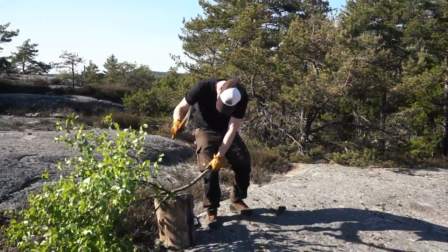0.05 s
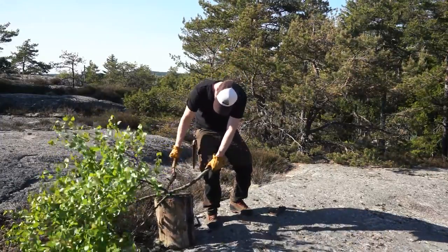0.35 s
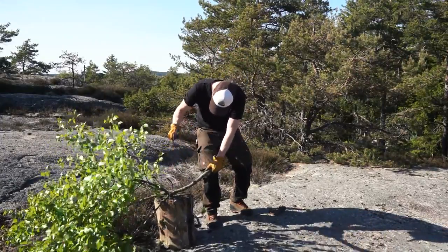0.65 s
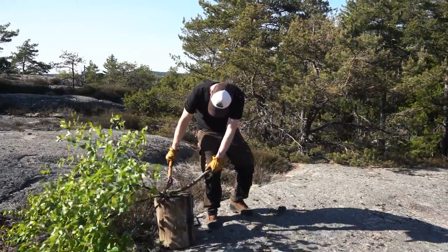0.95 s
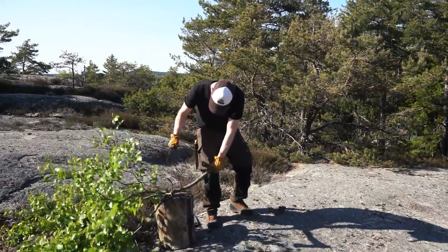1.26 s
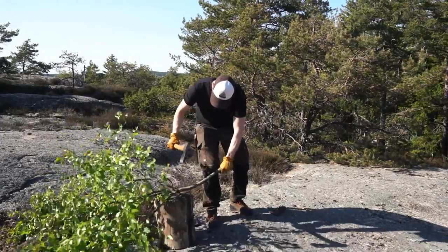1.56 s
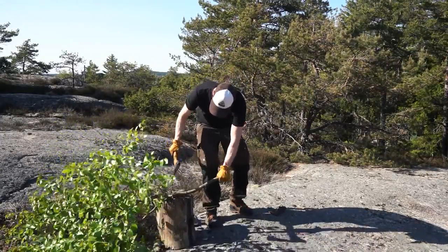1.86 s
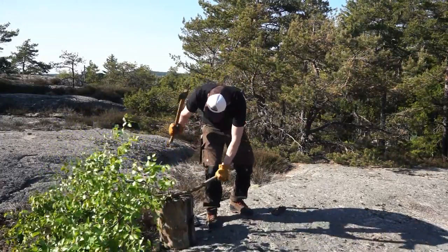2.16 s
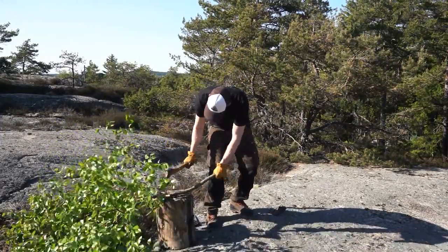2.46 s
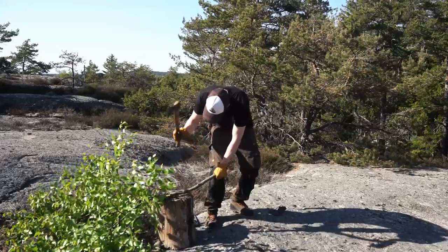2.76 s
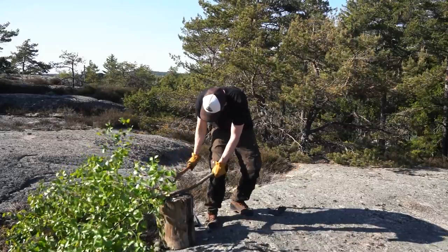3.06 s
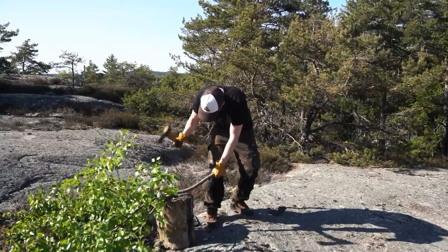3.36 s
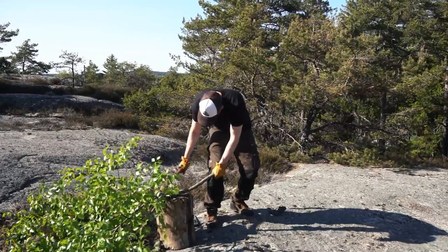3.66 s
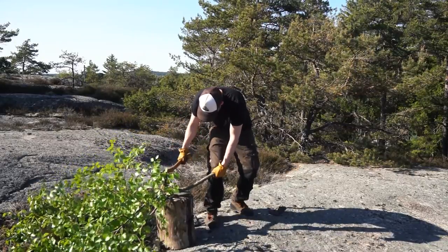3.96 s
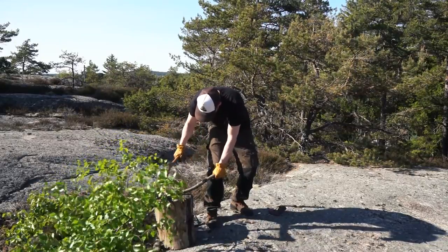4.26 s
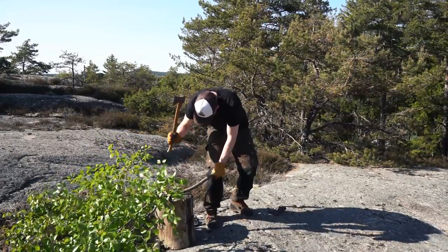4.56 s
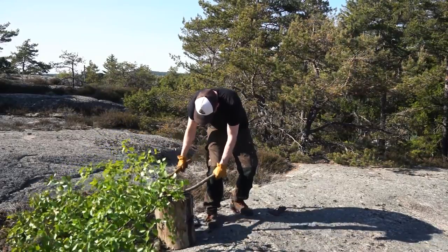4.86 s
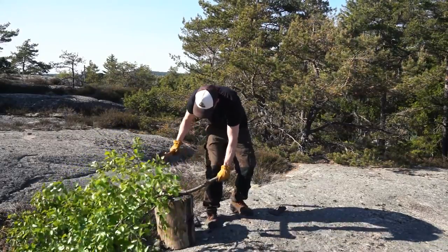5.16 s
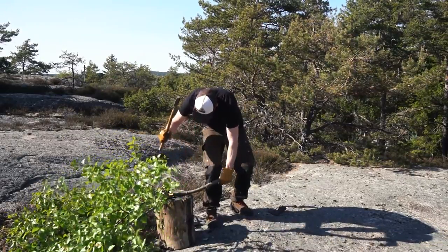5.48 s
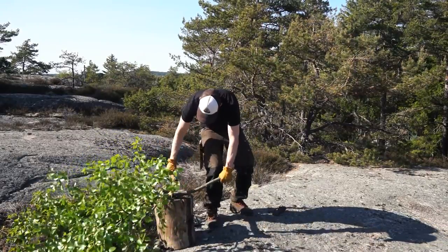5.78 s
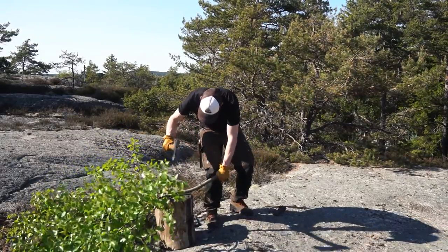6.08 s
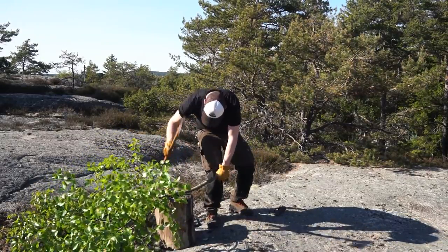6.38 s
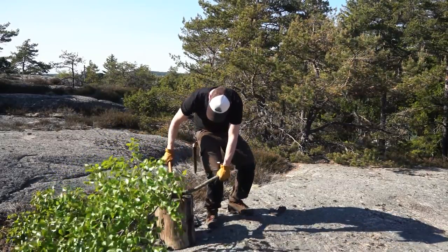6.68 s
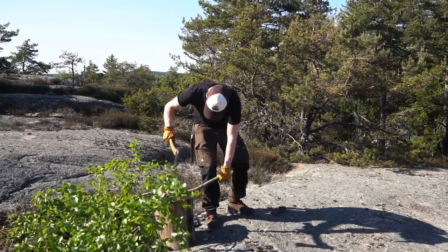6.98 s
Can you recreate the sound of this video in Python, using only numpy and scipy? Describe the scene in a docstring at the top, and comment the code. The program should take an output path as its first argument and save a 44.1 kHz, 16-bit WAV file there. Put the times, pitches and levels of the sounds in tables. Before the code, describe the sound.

Eight sharp hatchet chops bite into a leafy branch on a wooden block, with rustling leaves, snapping twigs and light wind.

```python
"""Bare rock at the edge of a pine wood; a stereo pair close to a chopping block, the work just to the left.
Light wind runs throughout. Leaves stir and a faint whistle rises, then eight hatchet blows fall on a leafy
branch: each bites, splits the wood, tears fibres and sets the leaves shivering. Between blows twigs snap,
leaves and small twigs tick and bark is dragged over the block; just before the last blow the cut creaks.
Rock and bushes give a short tail, the edge of the wood a faint later one."""
import sys
import numpy as np
from scipy import signal
from scipy.fft import rfft, irfft, next_fast_len
from scipy.io import wavfile
from scipy.ndimage import uniform_filter1d, map_coordinates

SR = 44100
rng = np.random.default_rng(int(sys.argv[2]) if len(sys.argv) > 2 else 0)


def dump_mix(stems):
    """Bounce the given channels to the path in sys.argv[1] as a 16-bit WAV at rate SR."""
    frames = np.atleast_2d(stems).T  # one column per channel
    limited = np.clip(frames, -1, 1)  # hard clip at full scale
    pcm = np.round(limited * 32767).astype(np.int16)
    wavfile.write(sys.argv[1], SR, pcm)


N = 314405

# hatchet blows: start_s, split_lag_s, bite_db (against the split), bite_hz, tear_s, low_ring_hz,
# high_ring_hz, strength_db, thud_db, bright_db_per_octave, jolt_db
BLOWS = [(0.3653, 0.0031, -16, 3000, 0.0038, 1080, 2090, -1.9, 8.5, 1.6, -28),
         (0.9919, 0.004, -8.5, 2500, 0.0094, 1550, 2430, -4, -1.5, 3.5, -37.5),
         (2.4355, 0.0024, -6.5, 1200, 0.0053, 940, 1980, 3, 5.5, -1.8, -32),
         (3.0638, 0.0023, -14, 3000, 0.0014, 1020, 1250, 5, -6.5, -4, -42),
         (3.7425, 0.0047, -1, 6200, 0.00049, 1980, 3120, 0, -5, -0.45, -43),
         (4.7782, 0.0015, -14, 2510, 0.0043, 1460, 2400, 0, -3, -1.1, -48),
         (5.7134, 0.004, -8, 5100, 0.0051, 1980, 2980, -1, 2.5, 1.2, -39),
         (6.534, 0.0031, -10, 2500, 0.005, 860, 1340, -1.6, 3.5, 1.5, -42.5)]
# left-right likeness of sound arriving from all around: frequency_hz, likeness
DIFFUSE_LIKENESS = [(150, 0.97), (400, 0.75), (800, 0.31), (1500, 0), (10000, 0.023)]


def amp(db):
    """Decibels to gain."""
    return 10 ** (np.asarray(db) / 20)


def unit(x):
    """Scale to rms 1."""
    return x / np.sqrt(np.mean(x ** 2) + 1e-20)


def along(points, hz):
    """Read (frequency_hz, value) points on a log frequency axis."""
    f, values = np.transpose(points)
    return np.interp(np.log(hz + 1), np.log(f + 1), values)


def wobble(rate):
    """A smooth random curve, rate knots a second."""
    return map_coordinates(rng.standard_normal(int(N * rate / SR) + 4), [np.arange(N) * rate / SR])


def dying(t, t60):
    """An envelope that starts at t = 0 and falls 60 dB in t60 seconds."""
    return (t >= 0) * np.exp(-np.log(1000) * np.abs(t) / t60)


def swells(rows):
    """Gain of exponential swells (peak_s, level_db, rise_s, fall_s); their powers add."""
    t, power = np.arange(N) / SR, np.zeros(N)
    for peak_s, db, rise_s, fall_s in rows:
        power += amp(db) ** 2 * np.exp(-2 * np.maximum((peak_s - t) / rise_s, (t - peak_s) / fall_s))
    return np.sqrt(power)


def add(track, start_s, sound):
    """Mix a sound into a track."""
    part = track[..., max(round(start_s * SR), 0):][..., :sound.shape[-1]]
    part += sound[..., :part.shape[-1]]


def filtered(x, response):
    """Filter x by a complex response of frequency."""
    n = x.shape[-1]
    padded = next_fast_len(n + SR // 4, True)
    return irfft(rfft(x, padded) * response(np.fft.rfftfreq(padded, 1 / SR)), padded)[..., :n]


def resonance(f, hz, width):
    """A causal resonance of peak gain 1."""
    return 1j * f * width / (hz * hz - f * f + 1j * f * width)


def coloured(burst, points):
    """Give a short burst a (frequency_hz, level_db) spectrum, keeping its fine ripple."""
    n = burst.shape[-1]
    spectrum = rfft(burst)
    power = uniform_filter1d(np.mean(np.abs(spectrum) ** 2, 0), size=35)
    gain = amp(along(points, np.fft.rfftfreq(n, 1 / SR))) / np.sqrt(np.abs(power) + 1e-12)
    cepstrum = irfft(np.log(gain))
    cepstrum[1:n // 2] *= 2  # minimum phase keeps the attack sharp
    cepstrum[n // 2 + 1:] = 0
    return irfft(spectrum * np.exp(rfft(cepstrum)))


def stereo(pair, likeness):
    """Blend two unrelated signals into left and right by (frequency_hz, likeness) points."""
    turn = lambda f: np.arccos(np.clip(along(likeness, f), -1, 1)) / 2
    mid, side = filtered(pair, lambda f: np.array([np.cos(turn(f)), np.sin(turn(f))]))
    return np.array([mid + side, mid - side])


def from_left(x, lead):
    """Sound from the left reaches the left microphone first."""
    return filtered(x, lambda f: np.exp(.5j * np.outer([1, -1], along(lead, f))))


def crackle(size, spread_db):
    """Two trains of tiny fractures: noise whose strength jumps every 16 samples."""
    strength = np.repeat(rng.standard_normal(size // 16 + 1), 16)[:size]
    return unit(rng.standard_normal((2, size)) * amp(spread_db * strength))


def wind():
    """Steady light wind in the pines, all around the microphones."""
    spectrum = [(30, -36), (50, -20.5), (100, -10.5), (170, -13.5), (280, -7.5), (460, -2), (810, 2),
                (1480, -1), (2680, -5.5), (4650, -8.5), (7750, -10), (12530, -17.5)]  # rush of air: frequency_hz, level_db
    noise = stereo(rng.standard_normal((2, N)), DIFFUSE_LIKENESS)
    rush = filtered(noise, lambda f: amp(along(spectrum, f)))
    return amp(-51 + 0.092 * wobble(2.3) + 0.38 * wobble(7.5)) * unit(rush)


def shaking(rise_s=0.03, rise_db=8, settle_db_per_s=59, air_drag_db=-46.5):
    """Level of the foliage: it sways, and after each blow the leaf hiss swells briefly, then dies away."""
    sways = [(0.0, -53.5, .05, 0.19), (1.06, -40.5, 0.02, 0.072), (1.25, -47, 0.1, 0.058),
             (1.45, -45.5, 0.11, 0.17), (1.69, -41.5, 0.081, 0.13), (1.92, -54.5, 0.3, 0.36),
             (3.99, -54, 0.13, 0.14), (4.21, -46.5, 0.086, 0.098), (4.42, -59.5, .07, 0.14),
             (4.87, -51.5, 0.033, 0.14), (5.05, -51, .07, 0.19), (5.19, -57.5, 0.088, 0.27),
             (6.02, -56.5, 0.096, 0.19), (6.66, -50.5, 0.13, 0.13), (6.86, -54.5, 0.061, 0.079),
             (7.11, -63, 0.079, .1)]  # the branch sways or is turned: peak_s, level_db, rise_s, fall_s
    shake = swells(sways)
    for start_s, *_, jolt_db in BLOWS:
        t = np.arange(N) / SR - start_s
        rise = (t >= 0) * amp(rise_db * (np.clip(t / rise_s, 0, 1) - 1))
        settle = amp(-settle_db_per_s * np.maximum(t - rise_s, 0))
        braking = 1 + amp(jolt_db - air_drag_db) * (1 - settle)  # air brakes a hard jolt fastest
        shake = np.hypot(shake, amp(jolt_db) * rise * settle / braking)
    return shake


def leaves(shake):
    """Countless leaf contacts merge into a bright, grainy hiss, left of the block."""
    spectrum = [(170, -24), (420, -8), (850, -9), (1700, -3), (3100, 0), (4900, 2.5), (7350, 0),
                (10820, -4.5), (14290, -7.5)]  # leaf hiss: frequency_hz, level_db
    likeness = [(400, 1), (1500, 0.98), (4000, 0.78), (9000, 0.29), (15000, 0.34)]  # between the microphones: frequency_hz, likeness
    balance = [(300, 1), (1200, 2), (5000, -0.2), (9000, 1), (14000, 8)]  # left over right: frequency_hz, balance_db
    lead = [(300, .05), (1400, 0.23), (2100, 0.84), (2800, 1.64), (4100, 2.4), (5500, 3.7), (7600, 4.26),
            (12400, 7.1)]  # left ahead of right: frequency_hz, lead_rad
    contacts = stereo(crackle(N, spread_db=2) * amp(0.59 * wobble(120)), likeness)
    hiss = filtered(contacts, lambda f: amp(along(spectrum, f) + np.outer([.5, -.5], along(balance, f))))
    return amp(7) * shake * unit(from_left(hiss, lead))


def twig_rattle(shake, rate_per_s=24, tick_db=-23.5):
    """Thin twigs knock together softly, more often and harder the more the branch is shaken."""
    spectrum = [(200, -24), (700, -12), (1500, 6.5), (2600, 6), (5000, 8), (15000, -25)]  # one knock: frequency_hz, level_db
    vigour = np.minimum(shake / amp(-48), 1)
    knocks = rng.random(N) < rate_per_s / SR * vigour ** 2
    ticks = knocks * np.sqrt(vigour) * amp(tick_db + 2.2 * rng.standard_normal(N))
    t = np.arange(1024) / SR
    ring = coloured(rng.standard_normal((2, len(t))) * dying(t, 0.011), spectrum)[0]
    return signal.fftconvolve(ticks, ring)[:N]


def whistle(peak_s=0.14, pitch_hz=2580, climb_hz_per_s=1400):
    """A faint, thin, wavering whistle rises in pitch."""
    glide = pitch_hz + climb_hz_per_s * (np.arange(N) / SR - peak_s)
    pitch = glide * (1 + .022 * wobble(330))
    swell = swells([(peak_s, -55.5, 0.057, 0.13)])
    return amp(1.5 * wobble(77)) * swell * np.sin(2 * np.pi * np.cumsum(pitch) / SR)


def chop_colour(strength_db, thud_db, bright_db_per_octave, thud_below_hz=654, bright_above_hz=1720):
    """The spectrum of one blow: a well-backed one thuds, a clean split is bright."""
    spectrum = [(30, -29), (75, -8), (160, -0.5), (420, 4.5), (950, 12), (1900, 16.3), (3600, 13.5),
                (6700, 13), (12000, 5.5)]  # splitting wood: frequency_hz, level_db
    hz, db = np.transpose(spectrum)
    thud = thud_db / (1 + (hz / thud_below_hz) ** 6)
    tilt = bright_db_per_octave * np.log2(np.maximum(hz / bright_above_hz, 1))
    return np.transpose([hz, db + strength_db + thud + tilt])


def chops(wedge_db=-15.5, direct_db=-2.14, ring_db=-2, ring_q=7.2):
    """The edge bites and wedges in, wood splits, fibres tear and brake the blade; branch and block ring."""
    block_modes = [(130, 21, 0.5), (413, 34, 4.5), (653, 70, -5), (882, 106, -3.5)]  # chopping block: pitch_hz, width_hz, level_db
    out, t = np.zeros((2, N)), np.arange(4096) / SR
    # the two microphones hear the finest splinters differently
    likeness = [(1500, 1), (3000, 0.92), (6000, 1), (14000, 0.35)]
    fibres = lambda: stereo(crackle(len(t), spread_db=-0.5), likeness)
    for start_s, lag_s, bite_db, bite_hz, tear_s, low_hz, high_hz, *colour, _ in BLOWS:
        bite = amp(bite_db) * fibres() * (dying(t, 0.0062) + 0.24 * dying(t, .02))
        bite = filtered(bite, lambda f: .3 + 0.82 * resonance(f, bite_hz, bite_hz / 2))
        wedge = amp(wedge_db) * (t < lag_s) * t / lag_s
        split = dying(t - lag_s, 0.0095)
        tearing = 0.22 * (t > lag_s) * dying(np.maximum(t - lag_s - tear_s, 0), 0.027)
        burst = bite + fibres() * (wedge + np.hypot(split, tearing))
        burst += 0.07 * np.roll(burst, round(.0031 * SR), axis=1)  # bounce off the bare rock
        blow = coloured(burst, chop_colour(*colour))
        branch = lambda f: sum(resonance(f, hz, hz / ring_q) for hz in (low_hz, high_hz))
        add(out, start_s, filtered(blow, lambda f: amp(direct_db) + amp(ring_db) * branch(f)))
    block = filtered(out, lambda f: sum(amp(db) * resonance(f, hz, width) for hz, width, db in block_modes))
    return amp(-.5) * out + amp(3.5) * block


def echoes(x, near_db=-19, near_t60_s=0.076, far_db=-27, far_t60_s=0.96):
    """Rock and bushes scatter a short tail; the edge of the wood returns a faint one later."""
    t = np.arange(SR) / SR
    diffuse = lambda: stereo(rng.standard_normal((2, SR)), DIFFUSE_LIKENESS)
    tail = lambda envelope: unit(diffuse() * envelope) / np.sqrt(SR)
    near = amp(near_db) * tail(dying(t - .006, near_t60_s))
    far = amp(far_db) * tail(dying(t, far_t60_s) * np.minimum(t / 0.1, 1) ** 2)
    spectrum = [(100, 2.2), (500, 7.3), (2500, 0.39), (10000, 4.7)]
    response = filtered(near + far, lambda f: amp(along(spectrum, f)))
    return signal.fftconvolve(x, response, axes=1)[:, :N]


def twig_snaps():
    """Each breaking twig gives a brief woody tick with a bright edge."""
    snaps = [(0.432, -16, 1470, -10), (0.834, -25, 3540, -5), (1.174, -23.5, 2600, -26),
             (1.58, -25.5, 1000, -17), (1.608, -25, 991, -16), (1.631, -15, 1170, -10),
             (1.664, -32, 1050, -17), (1.671, -19.5, 1010, -11), (1.684, -10, 1310, -13),
             (1.702, -18, 1960, -10), (1.75, -22.5, 2020, -20), (1.963, -29, 1770, -22),
             (2.063, -25, 1720, -10), (2.113, -25.5, 3100, -28), (2.36, -32.5, 1510, 0.5),
             (2.879, -33.5, 1945, -18), (3.945, -25, 2570, -17), (4.944, -26.5, 2240, -27),
             (5.033, -25, 1550, -13), (5.809, -24, 3420, -22), (6.435, -24, 1550, -5.5),
             (6.691, -30, 2600, -17), (7.01, -30, 1780, -14)]  # twigs and bark cracking: start_s, relative_db, pitch_hz, treble_db
    out, t = np.zeros((2, N)), np.arange(2048) / SR
    for start_s, db, hz, treble_db in snaps:
        burst = stereo(rng.standard_normal((2, len(t))), [(1500, 0.99), (10000, 0.24)]) * dying(t, 0.016)
        body = [(100, -32), (hz / 2, -7), (hz, 0), (hz * 2.07, -8)]
        edge = [(7000, treble_db - 5), (15000, treble_db - 8)]
        add(out, start_s, amp(db + 19) * coloured(burst, body + edge))
    return out


def foliage_ticks():
    """Now and then leaves and small twigs give a thin, high tick."""
    ticks = [(1.275, -23), (2.790, -35), (3.514, -34), (3.913, -44), (4.408, -31), (5.377, -32),
             (5.949, -29), (6.031, -27)]  # ticks of leaves and small twigs: start_s, relative_db
    spectrum = [(300, -25), (3000, -14), (10000, -5), (14500, -9)]
    out, t = np.zeros((2, N)), np.arange(1024) / SR
    for start_s, db in ticks:
        burst = rng.standard_normal((2, len(t))) * dying(t, 0.027)
        add(out, start_s, amp(db + 16) * coloured(burst, spectrum))
    return out


def bark_drag():
    """Rough bark catches and scrapes over the block while the branch is shifted."""
    strokes = [(1.385, -40, 0.029, 0.04), (1.618, -37.5, 0.015, .016), (1.674, -30, 0.011, 0.022),
               (2.0, -46, 0.022, 0.025), (6.495, -44.5, 0.023, 0.017)]  # pulls over the block: peak_s, level_db, rise_s, fall_s
    modes = [(1020, 220, -1), (1630, 350, 1.5), (2600, 1900, -7.5)]  # the rubbed branch: pitch_hz, width_hz, level_db
    catches = stereo(crackle(N, spread_db=0.5) * amp(2.4 * wobble(150)), [(1000, 1), (6000, 1)])
    body = lambda f: sum((-1) ** k * amp(db) * resonance(f, hz, width)
                         for k, (hz, width, db) in enumerate(modes))
    return swells(strokes) * unit(filtered(catches, body))


def creak(slip_gap_s=0.0053, fade_db=14, scatter_db=1.8):
    """The half-cut branch sticks and slips as it is bent; a little rasp follows each slip."""
    bends = [(6.4964, 0.012, -20), (6.515, 0.012, -20.5)]  # the cut gives: start_s, length_s, relative_db
    slips, t = np.zeros(N), np.arange(1024) / SR
    for start_s, length_s, db in bends:
        for since_s in np.arange(0, length_s, slip_gap_s):
            slip_db = db - fade_db * (since_s / length_s) ** 2 + scatter_db * rng.standard_normal()
            rasp = .036 * rng.standard_normal(len(t)) * dying(t, .045)
            add(slips, start_s + since_s, amp(slip_db + 26.5) * ((t == 0) + rasp))
    body = lambda f: resonance(f, 1950, 1000) * resonance(f, 2400, 1900) * resonance(f, 2850, 1300)
    return filtered(slips, body)


def scene():
    """From the microphones the wood sounds just left of centre, the foliage further left."""
    wood_lead = [(200, .02), (1400, 0.27), (2100, 0.13), (4100, 1.24), (7600, 1.64), (12400, 2.6)]  # left ahead of right: frequency_hz, lead_rad
    shake = shaking()
    wood = from_left(chops() + twig_snaps() + creak() + bark_drag() + twig_rattle(shake), wood_lead)
    return wood + echoes(wood) + leaves(shake) + foliage_ticks() + whistle() + wind()


def record(dry):
    """The camera rounds off the highest peaks and keeps nothing above its band limit."""
    ceiling, top_hz = 0.8, 15900
    rounded = dry / (1 + (dry / ceiling) ** 4) ** (1 / 4)
    return filtered(rounded, lambda f: 1 / np.sqrt(1 + (f / top_hz) ** 160))


dry = scene()
out = record(dry)
dump_mix(out)
```